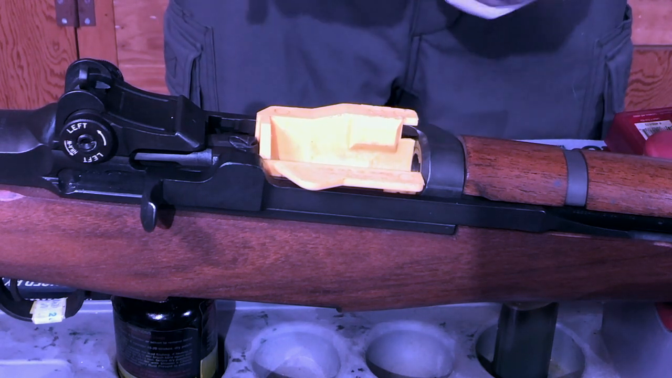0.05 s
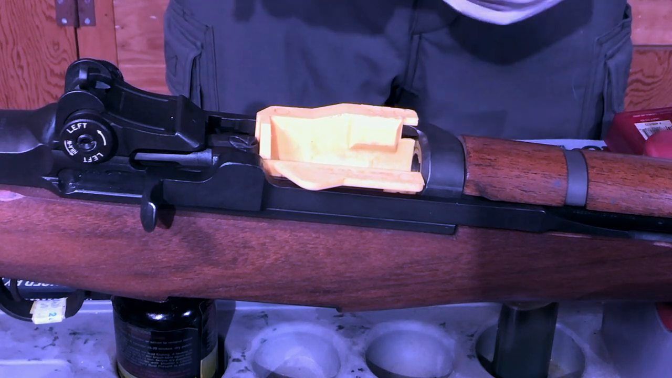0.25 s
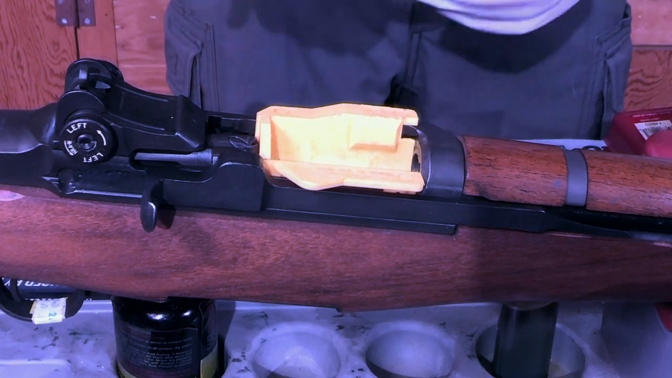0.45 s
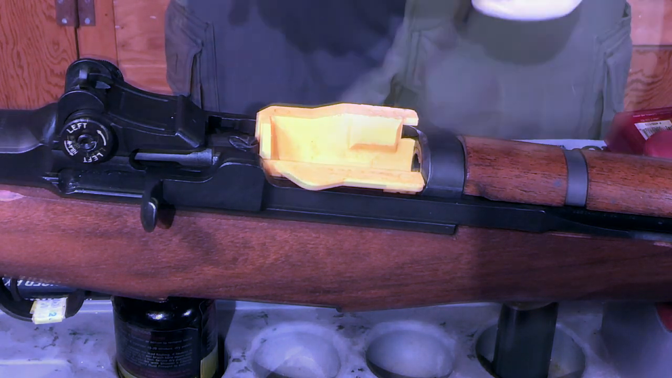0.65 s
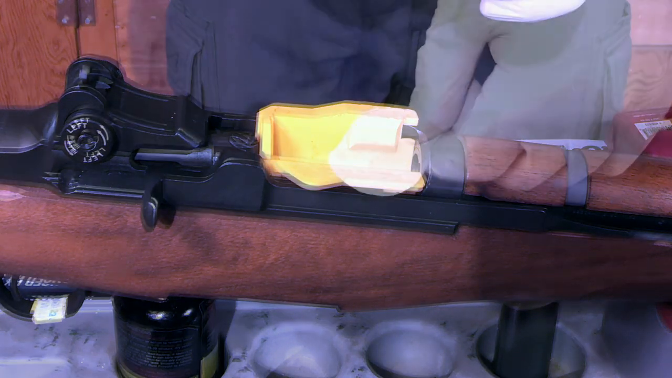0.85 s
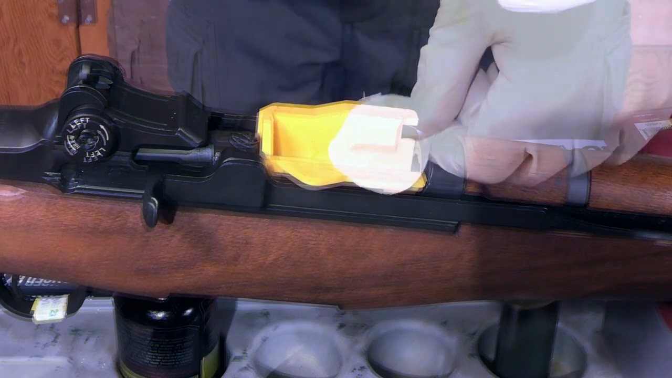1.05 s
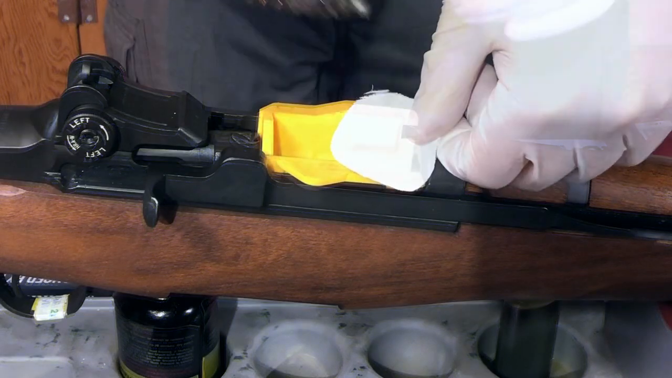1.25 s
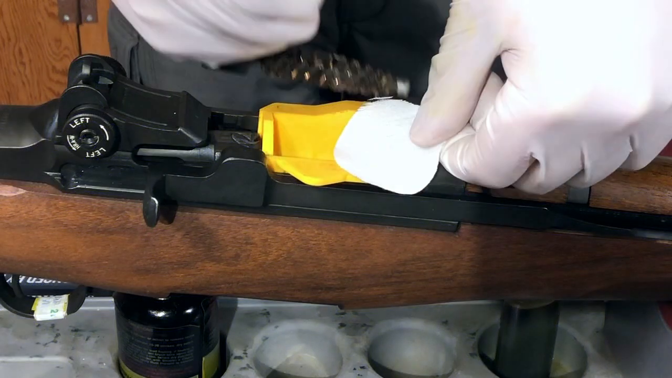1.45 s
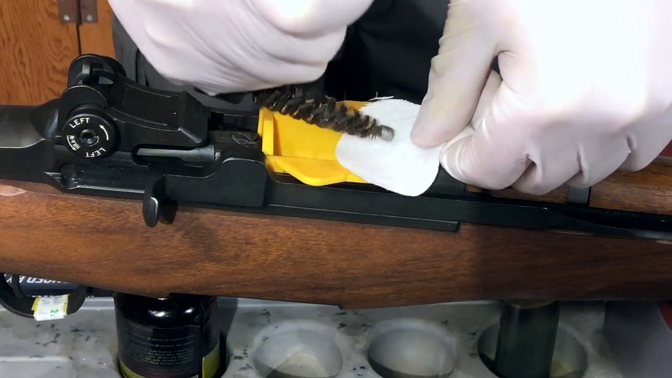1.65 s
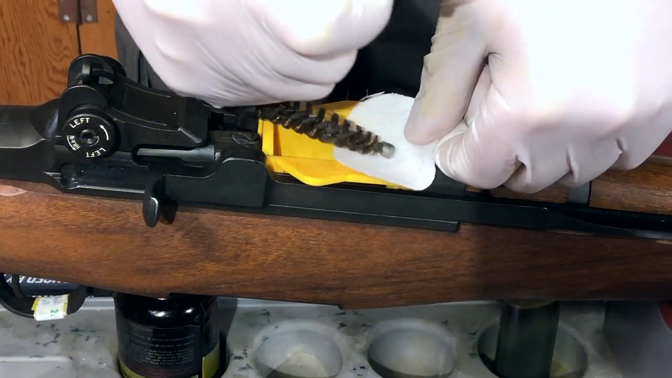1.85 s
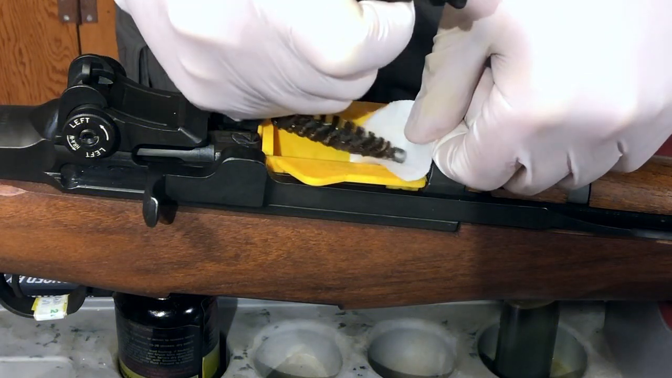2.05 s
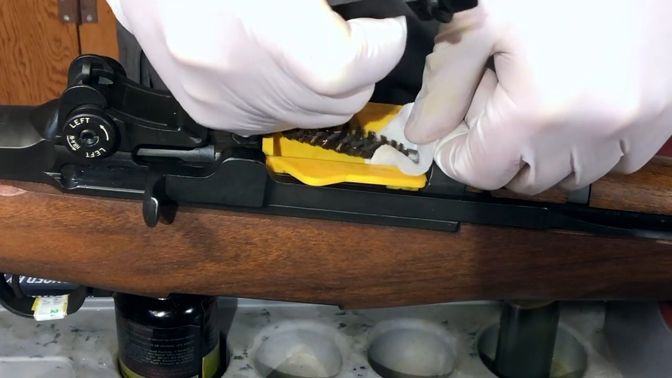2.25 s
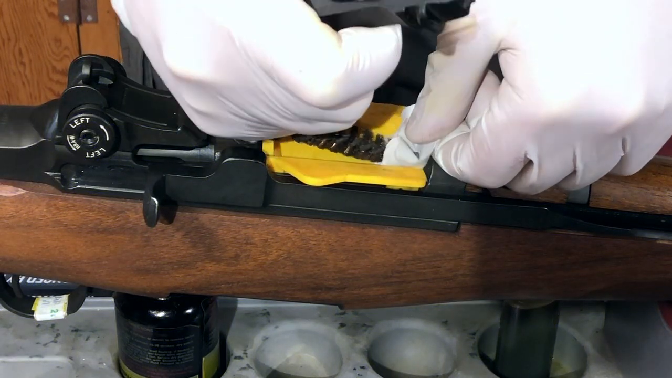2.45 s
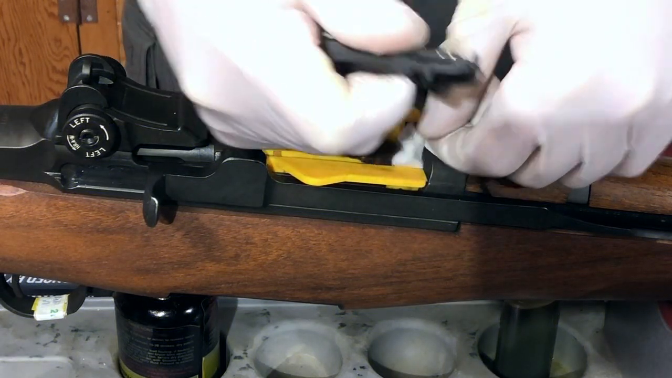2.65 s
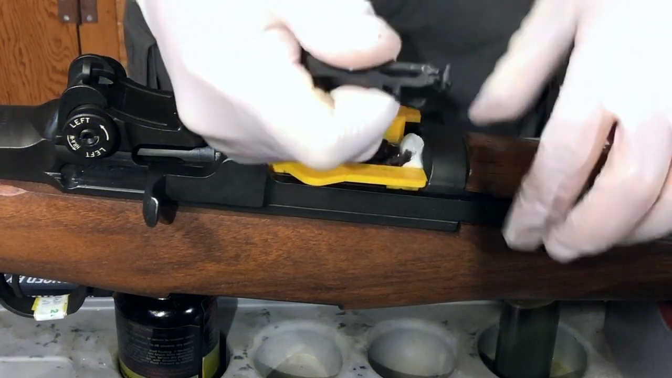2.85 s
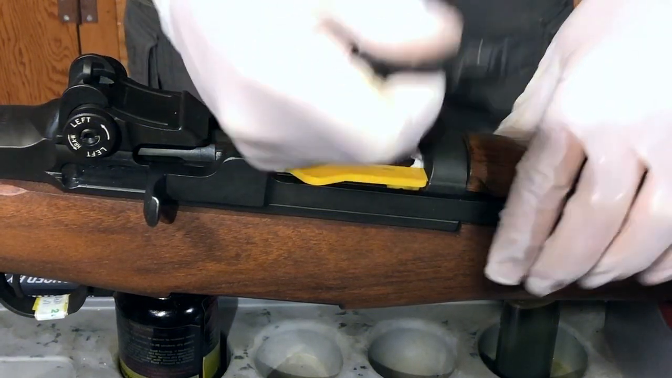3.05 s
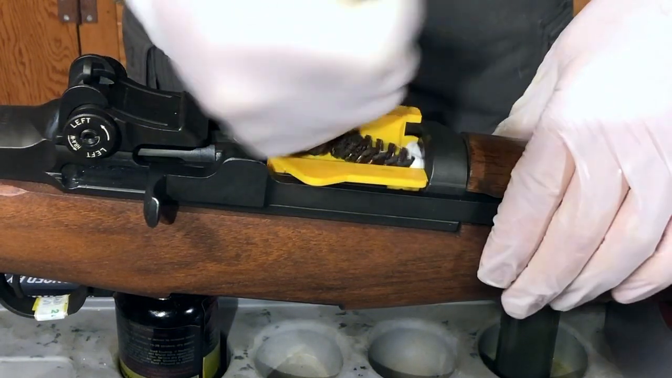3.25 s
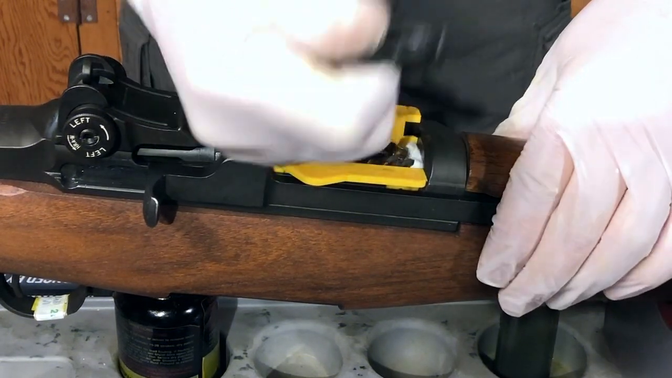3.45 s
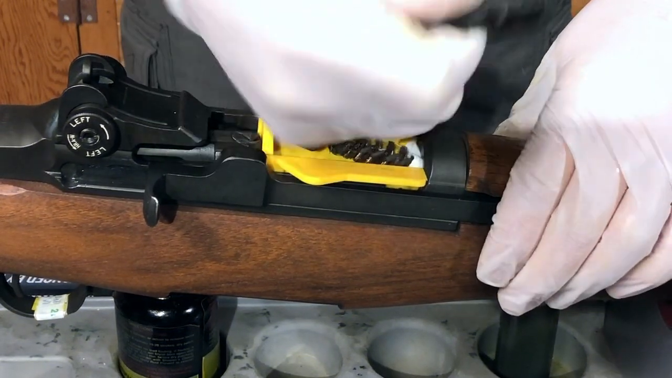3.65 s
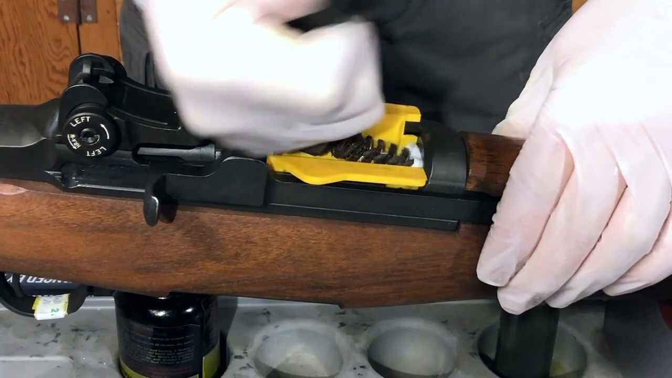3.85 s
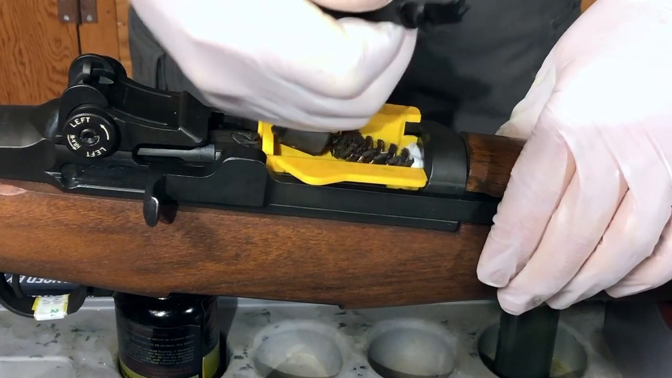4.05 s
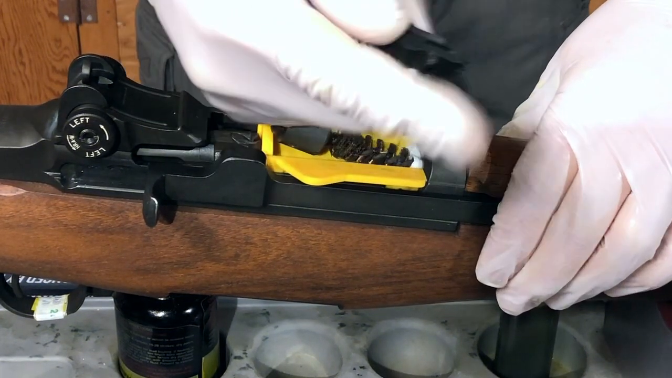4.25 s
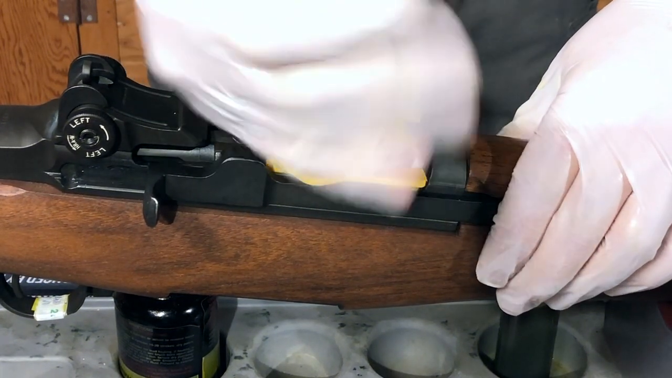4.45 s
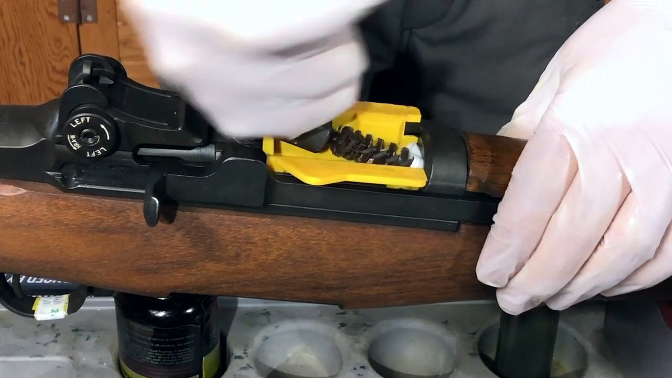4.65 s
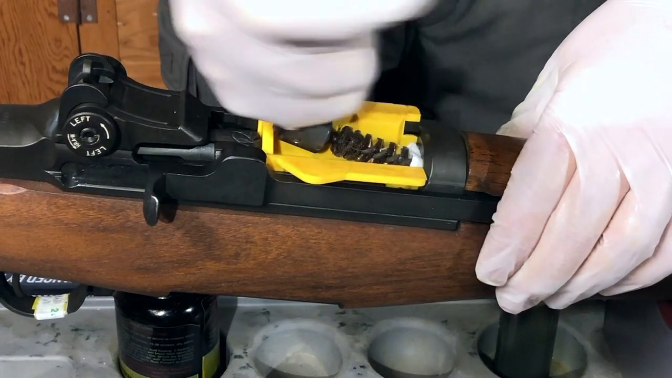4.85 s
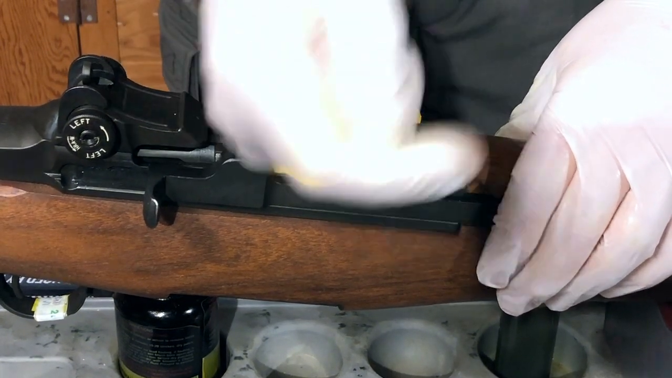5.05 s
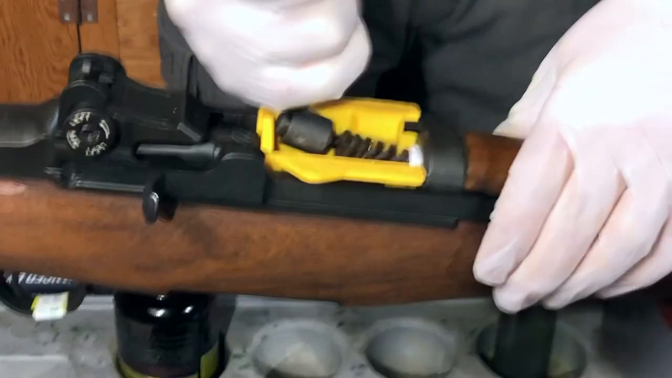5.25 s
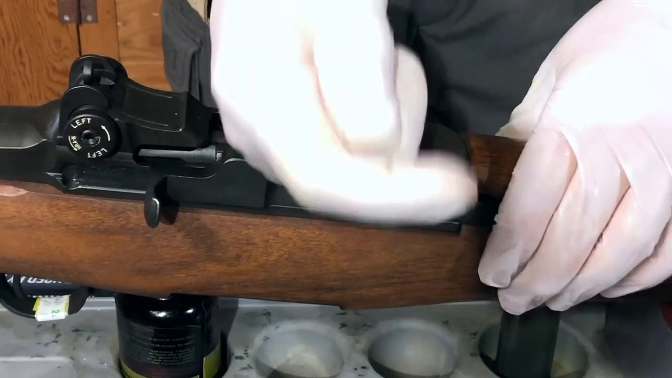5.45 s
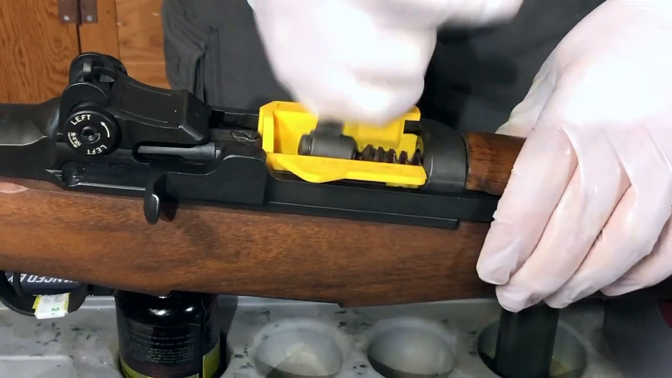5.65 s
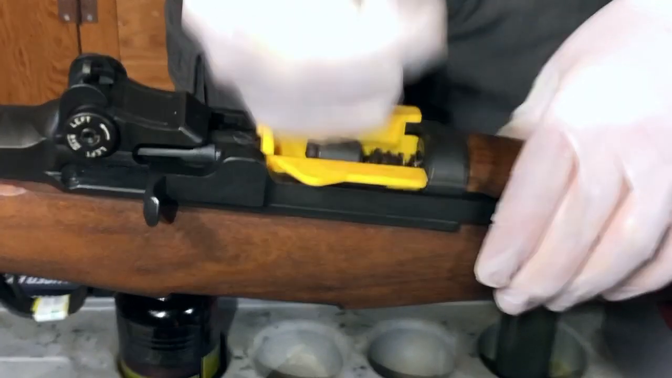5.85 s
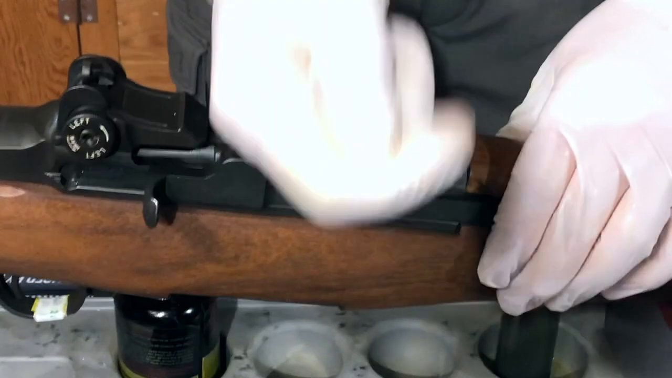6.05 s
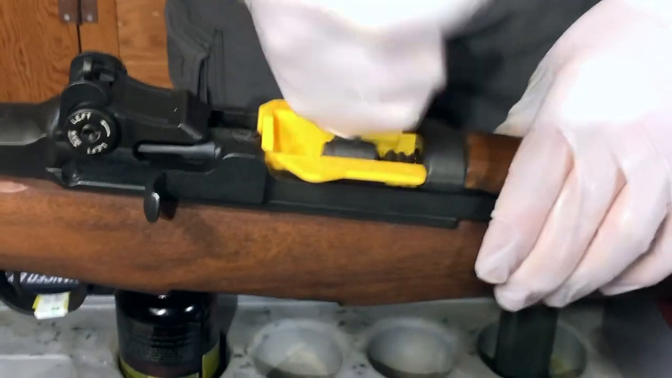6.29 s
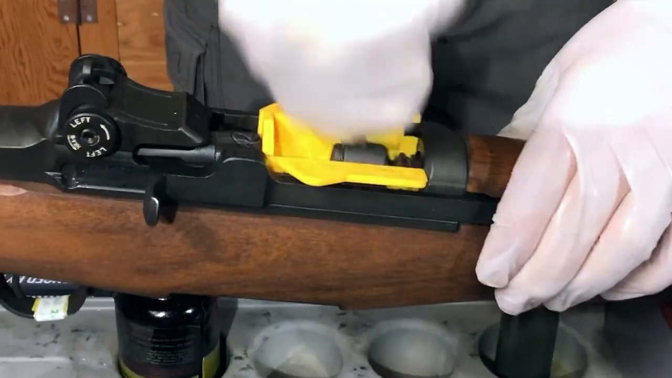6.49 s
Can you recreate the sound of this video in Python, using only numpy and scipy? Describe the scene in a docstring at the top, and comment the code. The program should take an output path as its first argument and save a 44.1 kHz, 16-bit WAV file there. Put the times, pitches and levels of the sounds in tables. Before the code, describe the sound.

In a small quiet room, heard close, sleeves and cloth rustle softly with a faint squeak. A wire brush then pushes a patch into a rifle chamber: gritty rasps, fabric hiss and bristle flicks between irregular metal clicks and hollow wooden thuds. The sharpest clack comes late, followed by three firmer cranking swings, each with a click, rough scrape and soft hand thumps on the stock.

```python
"""In a small room, close by, gloved hands push a cloth patch into a rifle chamber with a wire brush.
Sleeves rustle and bristles rasp as shaped friction noise; wire and fabric squeak and flick as resonances.
The tool knocks and clicks on the receiver, each blow ringing the rifle's modes plus a short burst of grit.
A blow runs through steel and stock as a bending wave: click first, wooden thud a few ms later.
A coil spring sings on faintly after the blows; once seated, the brush is cranked in three swings."""
import sys
import numpy as np
from scipy import signal
from scipy.fft import rfft, irfft
from scipy.io import wavfile
from scipy.ndimage import uniform_filter1d

SR = 44100
rng = np.random.default_rng(int(sys.argv[2]) if len(sys.argv) > 2 else 0)


def to_wav(sig):
    """Store sig (one row per channel, or 1-D mono) as 16-bit WAV at the path in sys.argv[1].

    Samples outside -1..1 are clipped; the rate is SR.
    """
    pcm = np.clip(np.atleast_2d(sig), -1, 1) * 32767
    pcm = np.round(pcm).astype(np.int16)
    wavfile.write(sys.argv[1], SR, pcm.T)  # frames by channels


N = 287532
TIME = np.arange(N) / SR

# Tool against rifle, levels ahead of the trims in blow(): (time [s], stock thud [dB], receiver knock [dB],
# steel clack [dB], edge [0 flat face - 1 sharp corner], range that the spot favours [Hz])
BLOWS = [(1.0246, -89.5, -98, -50, 0.79, 4300), (2.2756, -30.5, -46, -58, 0.23, 1230),
         (2.3926, -37, -51.5, -71, .1, 1200), (2.657, -25.5, -28, -40.5, 0.16, 384),
         (2.762, -36, -34, -50.5, .3, 446), (3.061, -25.5, -28.5, -39, 0.21, 2060),
         (3.337, -29.5, -29.5, -41.5, 0, 1490), (3.417, -30, -38.5, -50, 0.54, 1200),
         (3.8541, -30.5, -29.5, -44.5, 0, 1670), (4.223, -40.5, -51, -63, .4, 320),
         (4.375, -36.5, -46, -45, .4, 294), (4.5787, -41, -38, -26.5, 0.67, 4460),
         (4.6685, -36.5, -42, -35.5, 0.5, 2140), (5.0791, -32, -35.5, -24.5, 0.23, 2600),
         (5.2399, -27, -24, -18, 0.36, 1010), (5.827, -33.5, -35, -31, 0, 560),
         (5.87, -39, -33.5, -41.5, 0.52, 2850), (6.2575, -34, -39.5, -45, 0.23, 2040)]
# Clack that starts each swing of the handle: (time [s], clack level ahead of the trims in blow() [dB])
SWINGS = [(5.7732, -27.5), (6.082, -27.5), (6.3983, -28.5)]
PATCH_IN_S, PATCH_DEEP_S = 2.62, 5.42   # the patch enters the chamber; it is deep inside
BRACED_FROM_S = 5.15   # a hand braces the rifle for cranking


def from_db(db):
    """Decibels to gain."""
    return np.exp(np.asarray(db) * np.log(10) / 20)


def rms_one(x):
    """Scale to rms 1."""
    return x / np.sqrt(np.mean(x ** 2) + 1e-20)


def together(*gains):
    """Unrelated motions add in power."""
    return np.sqrt(sum(g ** 2 for g in gains))


def filtered(x, order, edges_hz, kind):
    """Butterworth filter."""
    return signal.sosfilt(signal.butter(order, edges_hz, kind, fs=SR, output="sos"), x)


def resonant(x, hz, q):
    """One resonance, gain 1 on top."""
    return signal.lfilter(*signal.iirpeak(hz, q, fs=SR), x)


def coloured(x, spectrum):
    """Give a signal a spectrum of (frequency [Hz], relative level [dB]) points; rms 1."""
    hz, db = np.transpose(spectrum)
    bins = np.maximum(np.fft.rfftfreq(N, 1 / SR), 1)
    shape_db = np.interp(np.log(bins), np.log(hz), db, left=-70, right=-70)
    return rms_one(irfft(rfft(x) * from_db(shape_db), N))


def drift(knots_per_s):
    """Slow chance, rms 1, running straight between random knots."""
    knots = rng.standard_normal(int(knots_per_s * N / SR) + 2)
    return rms_one(np.interp(TIME * knots_per_s, np.arange(len(knots)), knots))


def friction(per_s, spread_db, smooth, flutter_db):
    """Many tiny slips of uneven size over a smooth hiss, in clumps as the contact sticks and lets go."""
    happens = rng.random(N) < per_s / SR
    size = from_db(spread_db * np.minimum(rng.exponential(1, N), 5))
    slips = happens * rng.choice([-1, 1], N) * size
    return (rms_one(slips) + smooth * rng.standard_normal(N)) * from_db(flutter_db * drift(90))


def swells(rows, lean=0.095):
    """Gain of strokes (peak time [s], mean half length [s], level [dB]): quick to rise, gentler to fall."""
    s, half_s, db = np.transpose(rows)
    coarse = TIME[::20]
    since = coarse - s[:, None]
    width = half_s[:, None] * (1 + lean * np.sign(since))
    shape = 1 / np.cosh(np.minimum(np.abs(since) / width, 20)) ** 2
    return np.interp(TIME, coarse, np.sqrt(from_db(db) ** 2 @ shape))


def placed(hits):
    """Short sounds laid out at their times."""
    out = np.zeros(N + SR)
    for s, ring in hits:
        start = int(s * SR)
        out[start:start + len(ring)] += ring
    return out[:N]


def room_tone(level_db=-58.5):
    """The quiet room: steady noise, weighted to the low end."""
    # (frequency [Hz], relative level [dB])
    tone_spectrum = [(25, -21), (45, -17), (150, -11.5), (500, -6), (700, -9.5), (1050, -11.5),
                     (4400, -23.5), (16000, -31)]
    return from_db(level_db) * coloured(rng.standard_normal(N), tone_spectrum)


def sleeves(arms_db=-64, attack_s=0.014, fade_db_per_s=40):
    """Sleeve fibres rustle as the hands come in; a glove smooths the patch down with a fuller sound."""
    # sleeves brushing: (time [s], half length [s], level [dB])
    rustles = [(0.04, 0.027, -43.5), (0.3, 0.011, -53.5), (0.425, 0.033, -47.5), (0.505, 0.027, -46),
               (0.72, 0.0057, -53)]
    # glove on the patch: (time [s], level [dB])
    presses = [(1.098, -51), (1.255, -55.5)]
    # sleeve and patch spectra: (frequency [Hz], relative level [dB])
    cloth_spectrum = [(500, -3), (1500, -8), (2050, -1), (2800, -9), (3900, 1.5), (5000, 0.5), (6900, -6),
                      (9300, -4), (11000, -10.5), (16000, -13)]
    patch_spectrum = [(400, -24), (900, 4.5), (2200, 3), (4500, 0), (16000, -11)]
    # the arms keep moving a little until the patch is in place
    arms = from_db(arms_db) * np.clip((1.5 - TIME) / .5, 0, 1)
    speed = together(swells(rustles), arms)
    s, db = np.transpose(presses)[:, :, None]
    age = np.maximum(TIME - s, 0)
    press = together(*(np.minimum(age / attack_s, 1) * from_db(db - fade_db_per_s * age)))
    fibres = friction(per_s=1800, spread_db=3, smooth=2.2, flutter_db=1.9)
    return speed * coloured(fibres, cloth_spectrum) + press * coloured(fibres, patch_spectrum)


def squeaks(q=7):
    """Wire and fabric stick and slip: quick slips keep one resonance ringing in a gritty squeak."""
    # (time [s], half length [s], level [dB], pitch [Hz])
    squeak_rows = [(.492, 0.023, -46, 3900), (1.115, 0.015, -49, 4190), (5.328, 0.014, -39.5, 3800),
                   (5.583, 0.018, -48, 4000)]
    slips = friction(per_s=900, spread_db=2.5, smooth=0.57, flutter_db=7)
    out = 0
    for *stroke, hz in squeak_rows:
        tone = resonant(resonant(slips, hz, q), hz, q)
        out = out + swells([stroke]) * rms_one(tone)
    return out


def snaps(t60=0.022, q=1.34, faint_per_s=14, faint_db=-56, range_db=1.5, low_hz=1800, high_hz=12000):
    """Single bristles and fibres catch and flick free, each a tiny scratch with a pitch of its own."""
    # (time [s], level [dB], pitch [Hz])
    flicks = [(0.525, -53, 3840), (.54, -47.5, 3060), (1.911, -64.5, 11000), (3.535, -47, 10500),
              (3.549, -48.5, 7860), (3.713, -47, 9400), (4.368, -43.5, 4600), (5.312, -41.5, 11000)]
    # faint ones come at random while the patch goes in
    going_in_s = PATCH_DEEP_S - PATCH_IN_S
    draws = rng.random((int(faint_per_s * going_in_s), 3))
    faint = [(PATCH_IN_S + when * going_in_s, faint_db + range_db * size, low_hz * (high_hz / low_hz) ** pitch)
             for when, size, pitch in draws]
    age = np.arange(SR // 50) / SR
    hits = []
    for s, db, hz in [*flicks, *faint]:
        scratch = rng.standard_normal(len(age)) * from_db(-60 * age / t60)
        hits.append((s, from_db(db) * rms_one(resonant(scratch, hz, q))))
    return placed(hits)


def room(x, t60=0.16, low_hz=260, dull_hz=5440):
    """Dense reflections of a small room: a short mid-band tail, duller and thinner than the direct sound."""
    age = np.arange(SR // 2) / SR
    tail = filtered(rng.standard_normal(len(age)), 2, [low_hz, dull_hz], "band")
    tail = tail * from_db(-60 * age / t60) * (age > .004)
    return signal.fftconvolve(x, tail / np.sqrt(np.sum(tail ** 2) * SR / (2 * dull_hz)))[:N]


def hand(t60=0.11, rise_s=0.012, sag_s=0.15, rough=0.5, judder_per_s=130,
         deep_ratio=0.56, deep_lag_s=0.0151, deep_db=-5.5):
    """The heel of the hand bumps the stock and judders on it: a rough thump whose deeper part arrives last."""
    # soft bumps: (time [s], level [dB], starting pitch of the upper part [Hz])
    bumps = [(0.849, -46, 185), (4.241, -41, 103), (4.338, -36, 333), (5.135, -34.5, 220), (5.56, -49, 290),
             (5.822, -28.5, 220), (5.941, -39, 267), (6.118, -28.5, 226), (6.138, -27.5, 502),
             (6.276, -30, 261), (6.335, -33, 141)]
    age = np.arange(SR // 4) / SR
    thumps = []
    for s, db, hz in bumps:
        for lag, ratio, part_db in ((0, 1, 0), (deep_lag_s, deep_ratio, deep_db)):
            knots = rng.standard_normal((2, 100))
            push, drag = [np.interp(age * judder_per_s, np.arange(len(k)), k) for k in knots]
            # the pitch sags as the thump dies
            phase = 2 * np.pi * hz * ratio * sag_s * np.log1p(age / sag_s)
            wave = (1 + rough * push) * np.sin(phase) + rough * drag * np.cos(phase)
            envelope = from_db(db + part_db - 60 * age / t60) * (1 - np.exp(-age / rise_s))
            thumps.append((s + lag, envelope * wave))
    return placed(thumps)


def bending(x, lag_s=0.00849, knee_hz=560):
    """Bending waves are slower at low pitch, so a blow arrives as a quick falling chirp."""
    size = 2 * len(x)
    delay_s = lag_s / (1 + (np.fft.rfftfreq(size, 1 / SR) / knee_hz) ** 2)
    phase = 2 * np.pi * np.cumsum(delay_s) * SR / size
    return irfft(rfft(x, size) * np.exp(-1j * phase), size)[:len(x)]


def blow(clack_db, boom_db, thud_db, knock_db, tick_db, contact_hz, deep, snap_db=13, count=3,
         scatter_db=2.5, detune=0.064, stock_detune=0.032, grip_db=2.5, crack_t60=0.018, tick_t60=0.0062,
         spot_db=1.5, spot_q=2.6):
    """One contact rings every mode; where and how hard it lands balances stock, receiver and tool."""
    # modes of the rifle, before each blow's scatter: (frequency [Hz], level [dB], t60 [s])
    rifle_modes = [(87, -19.5, 0.29), (261, -10, 0.18), (342.7, -8.5, 0.085), (396, -0.5, 0.05),
                   (469.5, 2, 0.056), (559, -3.5, 0.032), (565, -10.5, 0.034), (872, -14.5, 0.025),
                   (1025, -1.5, 0.015), (1213, 2.5, 0.014), (1453, -9, 0.015), (1780, -3.5, 0.016),
                   (2143, 4.5, 0.0075), (3090, -1, 0.012), (3680, 0, 0.0083), (4247, -6.5, 0.01),
                   (4890, -16.5, 0.011), (5710, -2, 0.011), (7230, 0.5, 0.0045), (9450, -1, 0.0012)]
    # from deep in the chamber the tool drives the stock differently: (frequency [Hz], change [dB])
    deep_stock = [(255, -4), (340, 3), (460, -2.5), (550, -0.5)]
    # the stock is pushed as one piece; the short steel rings come in close clusters
    modes = [mode for mode in rifle_modes for _ in range(count if mode[0] > 2000 else 1)]
    hz, mode_db, t60 = np.transpose(modes)[:, :, None]
    boom, thud, knock = boom_db + 8.5, thud_db + 2.5, knock_db + 4.5
    clack, tick = clack_db + 8.0, tick_db + 12.5
    strength_db = np.interp(np.log(hz), np.log([260, 330, 600, 850, 1500, 2700, 5400, 7200]),
                            [boom, thud, thud, knock, knock, clack, clack, tick])
    strength_db = strength_db + deep * np.interp(hz, *np.transpose(deep_stock))
    # each blow's mode pitches scatter a little at random
    steel = hz > 2000
    sign = np.where(steel, rng.choice([-1, 1], hz.shape) / np.sqrt(count), 1)
    hz = hz * (1 + np.where(steel, detune, stock_detune) * rng.uniform(-1.16, 1, hz.shape))
    # the hand damps every blow differently
    t60 = t60 * from_db(grip_db * rng.standard_normal(hz.shape))
    t = np.arange(SR // 6) / SR
    swell = 1 - np.exp(-2 * t * hz)
    gain = from_db(strength_db + mode_db + scatter_db * rng.standard_normal(hz.shape) - 60 * t / t60)
    ring = np.sum(sign * gain * swell * np.sin(2 * np.pi * hz * t), axis=0)
    # the edges meet with one sharp snap, then grate for a moment
    grit = rng.standard_normal(len(t))
    grit[SR // 2000] = from_db(snap_db)
    grate = filtered(grit, 2, [2000, 5400], "band")
    spit = filtered(grit, 1, [6500, 13000], "band")
    ring = ring + from_db(clack_db + 8 - 60 * t / crack_t60) * grate
    ring = ring + from_db(tick_db + 14 - 60 * t / tick_t60) * spit
    # each spot on the rifle favours its own range of modes
    return bending(ring + from_db(spot_db) * resonant(ring, contact_hz, spot_q))


def contact(s, thud_db, knock_db, clack_db, edge, hz, held_until_s=2.9, flat_tick_db=-24, edge_tick_db=35.5):
    """A blow at its time: a hand damps the deepest modes, and a sharp corner adds a bright tick."""
    # the hand is first on the action, and later braces the rifle; in between the stock booms more
    boom_db = -3 if held_until_s < s < BRACED_FROM_S else -7
    tick_db = clack_db + flat_tick_db + edge_tick_db * edge
    return s, blow(clack_db, thud_db + boom_db, thud_db, knock_db, tick_db, hz, s > PATCH_DEEP_S)


def tap(s, db, hz, stock_db=-6.5, steel_db=-11):
    """A light tap of the tool: middle modes lead, with less stock and steel."""
    return contact(s, db + stock_db, db, db + steel_db, 0, hz)


def tool(lowest_hz=85, echo_s=.0155, echo_db=-10.5, echo_dull_hz=780):
    """All blows, followed by one dull reflection; the slim stock radiates almost no deep bass."""
    # light taps: (time [s], level ahead of the trims in blow() [dB], range that the spot favours [Hz])
    taps = [(3.1175, -40, 1180), (5.197, -31.5, 2140), (5.367, -42, 4000), (5.895, -39, 890),
            (6.041, -44, 1020), (6.17, -37.5, 2660), (6.197, -36, 940), (6.4368, -36.5, 2600),
            (6.462, -48, 2540)]
    hits = [contact(*row) for row in BLOWS]
    # swing clacks: thud 3 dB and knock 4 dB under the clack, nearly flat contact
    hits += [contact(s, db - 3, db - 4, db, 0.02, 3800) for s, db in SWINGS]
    hits += [tap(*row) for row in taps]
    out = filtered(placed(hits), 2, lowest_hz, "high")
    dull = filtered(out, 2, echo_dull_hz, "low")
    return out + from_db(echo_db) * np.interp(TIME - echo_s, TIME, dull, left=0)


def spring(level_db=-71.5, t60=2.8, follows=0.23):
    """Every thud in BLOWS shakes a coil spring in the action, which shimmers on after the stock is still."""
    # clusters of close modes: (centre [Hz], width [Hz], level [dB], change once the rifle is braced [dB])
    clusters = [(1170, 220, 5, -3), (2100, 60, 4, 6)]
    s, thud_db = np.transpose(BLOWS)[:2, :, None]
    coarse = TIME[::20]
    age = coarse - s
    # the spring follows only a share of the thud's swing in dB
    start_db = level_db + follows * (thud_db - thud_db.mean())
    shaken = (age > 0) * from_db(start_db - 60 * np.abs(age) / t60)
    coils = rng.standard_normal(N)
    shimmer = 0
    for hz, width, db, braced_db in clusters:
        band = rms_one(filtered(coils, 2, [hz - width / 2, hz + width / 2], "band"))
        shimmer = shimmer + from_db(db + braced_db * (TIME > BRACED_FROM_S)) * band
    return np.interp(TIME, coarse, together(*shaken)) * shimmer


def pressure(touch_s=2.28, touch_db=-10.5, seated_s=5.78, seated_db=8.5, regrip_db=-6):
    """How hard the bristles lean on the steel between strokes, as a gain; harder once seated."""
    # the hand eases off to shift its grip: (time [s], half length [s])
    regrips = [(3.28, 0.025), (4.128, 0.019), (4.86, 0.27), (5.7, 0.034), (5.993, 0.09)]
    eased = sum(np.exp(-((TIME - s) / half_s) ** 2) for s, half_s in regrips)
    # before the patch enters, the brush only touches lightly
    db = touch_db * (TIME < PATCH_IN_S) + seated_db * (TIME > seated_s) + regrip_db * eased
    return uniform_filter1d(from_db(db) * (TIME > touch_s), size=SR // 50)


def catching(slips, low_hz=900, high_hz=8500, q=7, patchy_db=4, per_s=90, count=16):
    """Bristles of many lengths ring briefly, each group catching and letting go on its own."""
    out = 0
    for k, hz in enumerate(np.geomspace(low_hz, high_hz, count)):
        knots = from_db(patchy_db * rng.standard_normal(1000))
        grip = np.interp(TIME * per_s + k / count, np.arange(len(knots)), knots)
        out = out + (-1) ** k * resonant(slips * grip, hz, q)
    return out


def brush(rub_drag_db=-57, rub_rasp_db=-58, rub_hiss_db=-60, scrub_drag_db=-1, scrub_hiss_db=-8.5,
          swing_drag_db=-2, swing_hiss_db=-11, slip_rasp_db=-1.5, patch_fade_s=0.46, treble_db=2):
    """Wire bristles rasp on steel, the patch hisses, and scrubs and swings shake the stock."""
    # the brush is twisted into the chamber: (time of fastest point [s], half length [s], rasp level [dB])
    scrubs = [(2.692, 0.04, -45.5), (2.935, 0.011, -50), (3.02, 0.048, -48), (3.775, 0.026, -43.5),
              (3.93, 0.025, -46), (4.385, 0.025, -46), (5.064, 0.014, -44), (5.335, 0.072, -48),
              (5.575, 0.033, -51.5)]
    # short slips over the metal, and one hard, very brief scrape at the loudest blow; levels ahead of
    # slip_rasp_db and treble_db: (time of fastest point [s], half length [s], level [dB], brightest range [Hz])
    slip_rows = [(2.81, 0.013, -55, 13500), (3.507, 0.011, -49.5, 3420), (3.723, 0.0065, -39, 3980),
                 (4.029, 0.011, -49.5, 6900), (4.205, 0.011, -39.5, 8700), (4.34, 0.02, -50.5, 9500),
                 (4.568, 0.025, -47.5, 7600), (5.2392, 0.0013, -23.5, 3800)]
    # in a swing the bristles take up slack, scrub, and spring back:
    # (time after the clack [s], half length [s], level against the clack's table level [dB])
    phases = [(-.04, 0.021, -21), (0.038, 0.017, -16), (0.14, 0.02, -14)]
    # stock, bristle and patch spectra: (frequency [Hz], relative level [dB])
    drag_spectrum = [(30, -42), (48, -8.5), (200, -13), (260, -2.5), (460, -2), (750, -9), (1150, -10),
                     (4000, -44)]
    rasp_spectrum = [(400, 8), (900, -4.5), (2200, -2), (4200, -4), (5600, -9), (7500, -16), (16000, -7)]
    hiss_spectrum = [(2500, -4), (5000, -1.5), (7000, -2), (16000, -8)]
    rub, scrub, slip = pressure(), swells(scrubs), swells([row[:3] for row in slip_rows])
    swing = swells([(s + after_s, half_s, db + phase_db)
                    for s, db in SWINGS for after_s, half_s, phase_db in phases])
    # the light rub makes the patch hiss from entering until it is deep in the chamber
    exposed = (TIME > PATCH_IN_S) * np.clip((PATCH_DEEP_S - TIME) / patch_fade_s, 0, 1)
    hiss_gain = together(from_db(rub_hiss_db) * rub * exposed, from_db(scrub_hiss_db) * scrub,
                         from_db(swing_hiss_db) * swing)
    rasp_gain = together(from_db(rub_rasp_db) * rub, scrub, swing, from_db(slip_rasp_db) * slip)
    drag_gain = together(from_db(rub_drag_db) * rub, from_db(scrub_drag_db) * scrub,
                         from_db(swing_drag_db) * swing)
    shaking = friction(per_s=220, spread_db=3.5, smooth=1.0, flutter_db=2.5)
    drag = drag_gain * coloured(shaking, drag_spectrum)
    bristles = catching(friction(per_s=1100, spread_db=2.0, smooth=0.89, flutter_db=1.5))
    rasp = rasp_gain * coloured(bristles, rasp_spectrum)
    threads = coloured(friction(per_s=1100, spread_db=2.5, smooth=1.0, flutter_db=2.0), hiss_spectrum)
    slips = sum(swells([stroke]) * rms_one(threads + 2 * resonant(threads, hz, 1))
                for *stroke, hz in slip_rows)
    return drag + rasp + from_db(treble_db) * (hiss_gain * threads + slips)


def scene(room_db=-11):
    """Tool, brush and sleeves over the quiet room; the short knocks also excite the room's tail."""
    knocks = tool() + hand() + snaps()
    reflected = from_db(room_db) * room(knocks)
    rubbing = brush() + squeaks() + sleeves()
    return (knocks + reflected + spring() + rubbing + room_tone())[None]


def record(dry, cutoff_hz=16000):
    """The top is cut steeply."""
    return signal.sosfilt(signal.ellip(10, .1, 90, cutoff_hz, fs=SR, output="sos"), dry)


dry = scene()
out = record(dry)
to_wav(out)
```